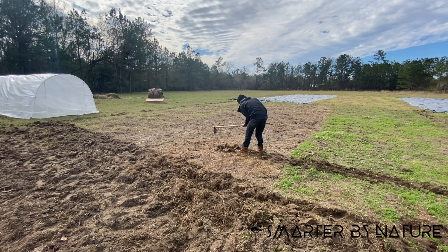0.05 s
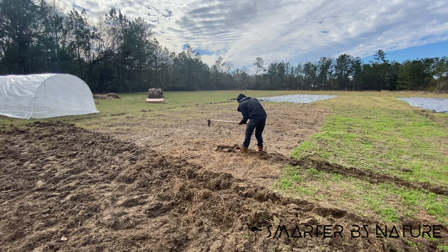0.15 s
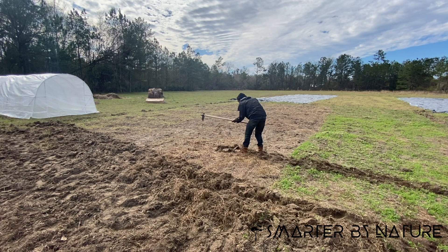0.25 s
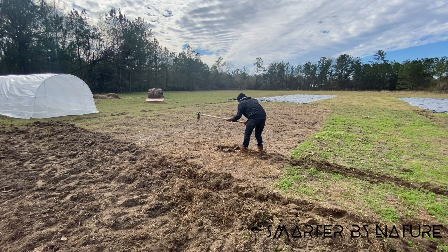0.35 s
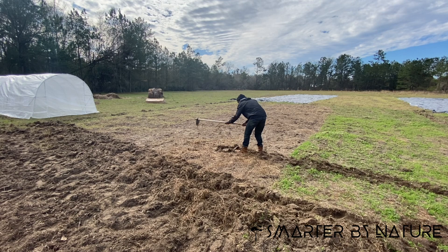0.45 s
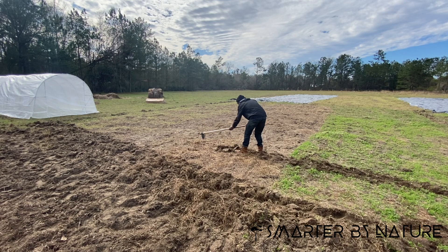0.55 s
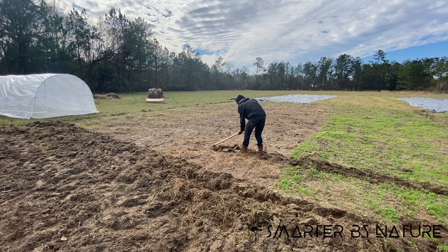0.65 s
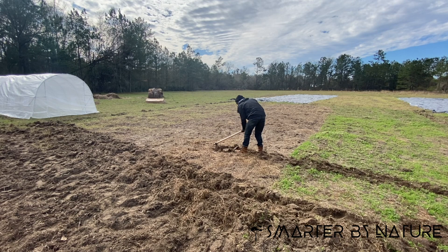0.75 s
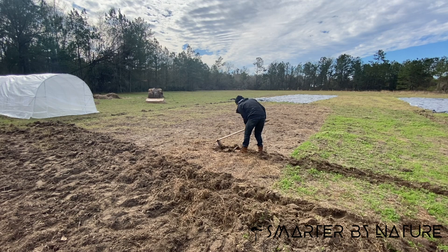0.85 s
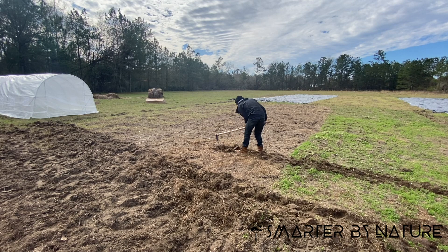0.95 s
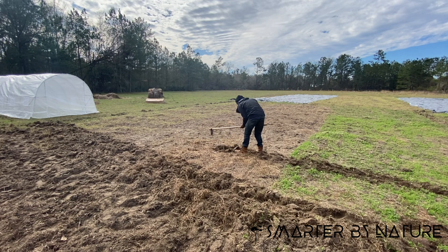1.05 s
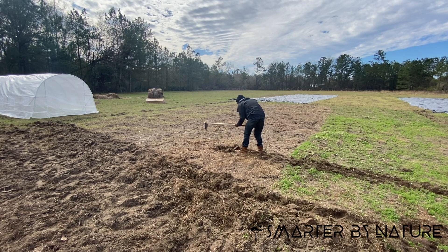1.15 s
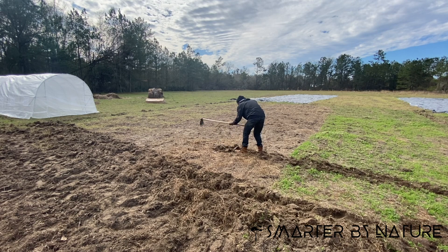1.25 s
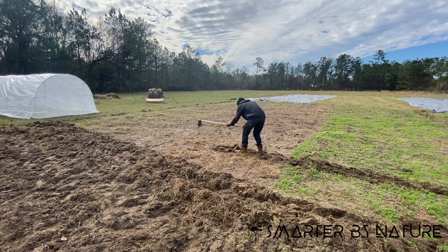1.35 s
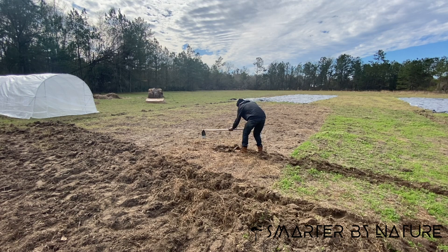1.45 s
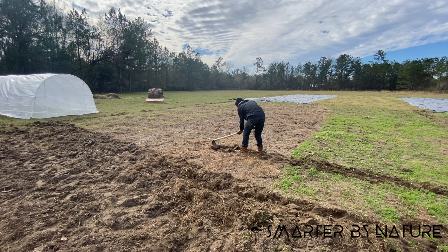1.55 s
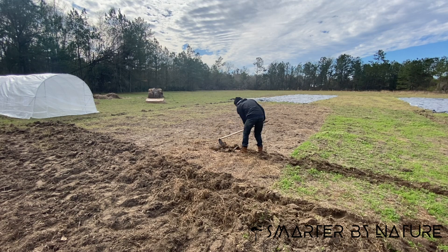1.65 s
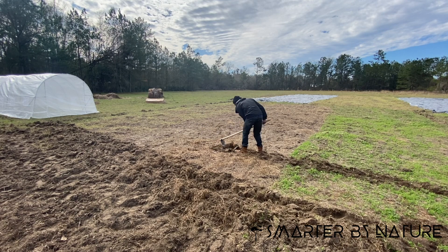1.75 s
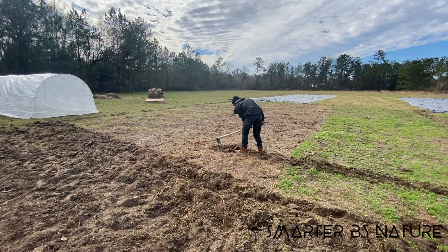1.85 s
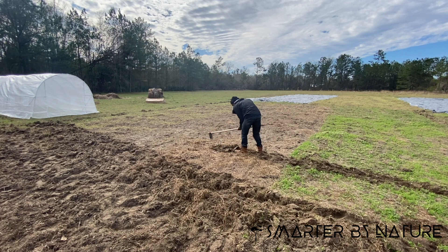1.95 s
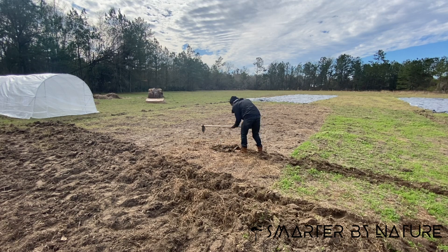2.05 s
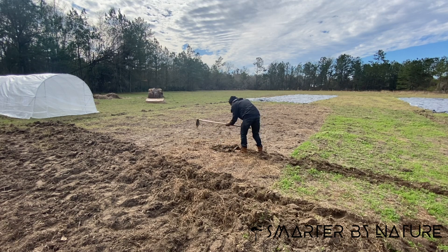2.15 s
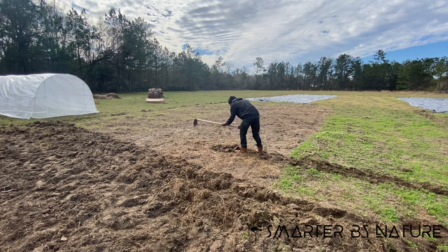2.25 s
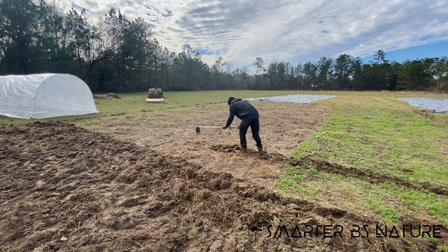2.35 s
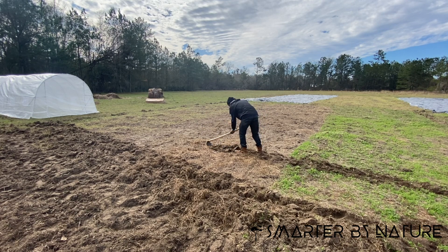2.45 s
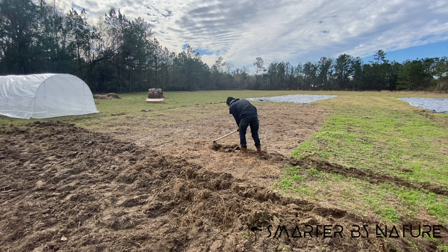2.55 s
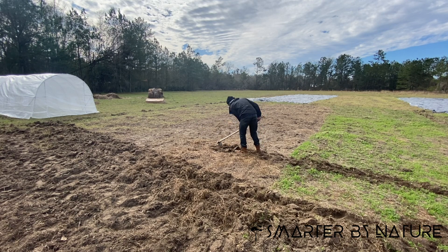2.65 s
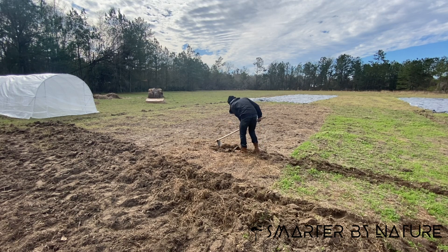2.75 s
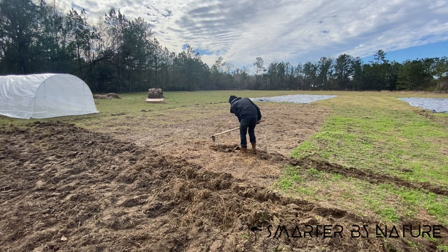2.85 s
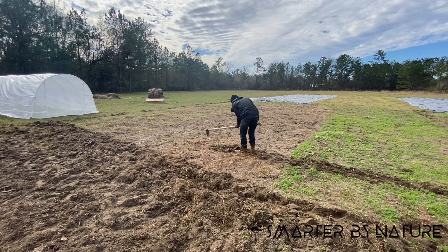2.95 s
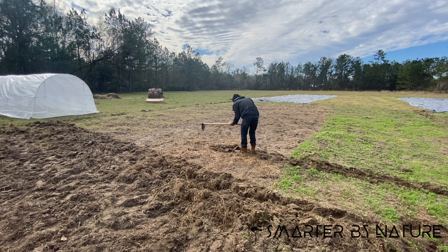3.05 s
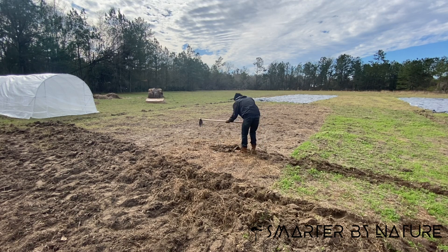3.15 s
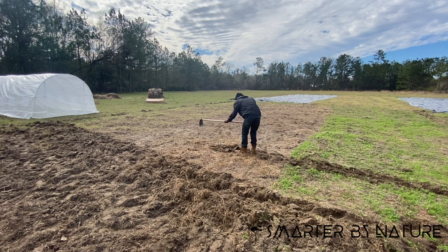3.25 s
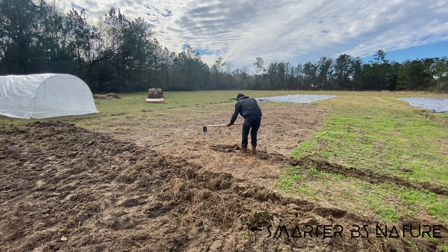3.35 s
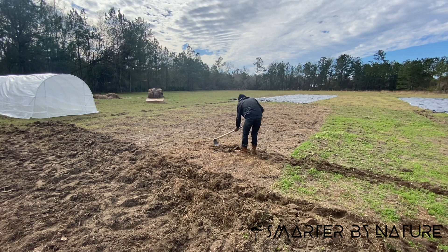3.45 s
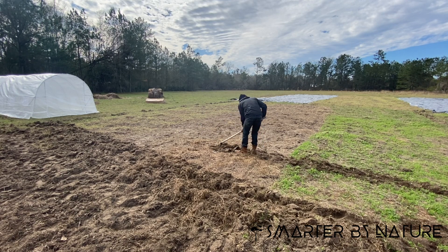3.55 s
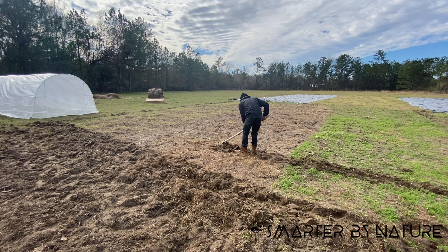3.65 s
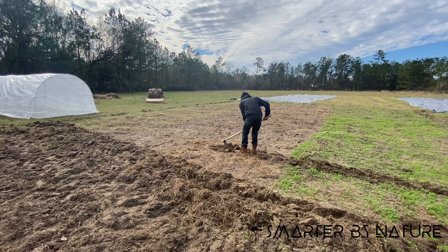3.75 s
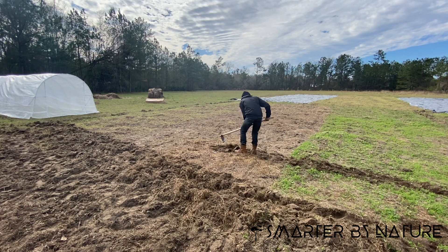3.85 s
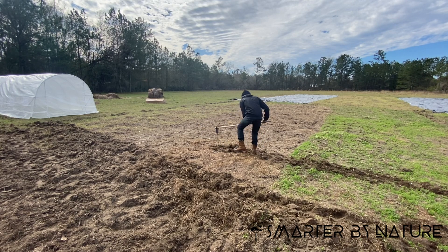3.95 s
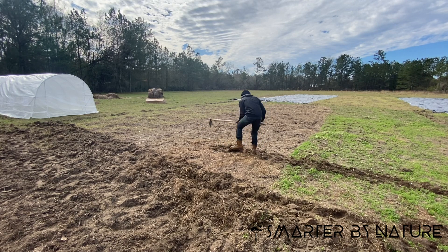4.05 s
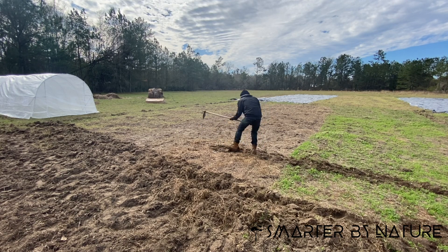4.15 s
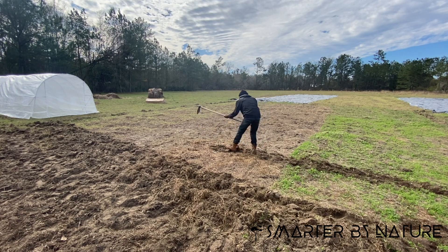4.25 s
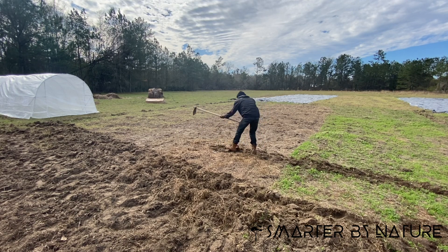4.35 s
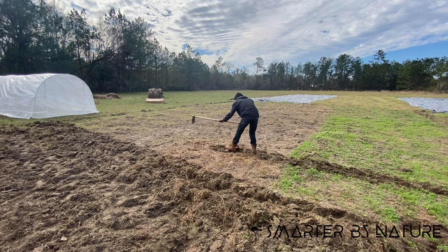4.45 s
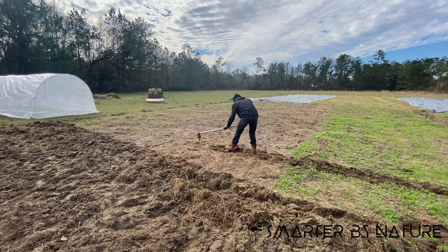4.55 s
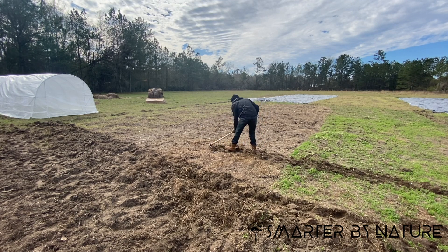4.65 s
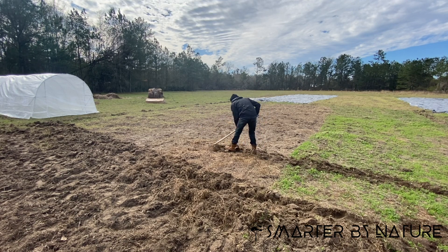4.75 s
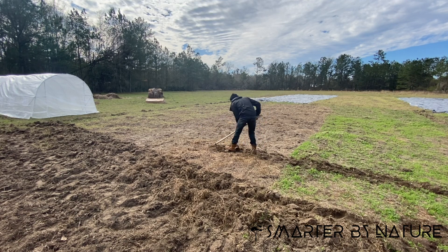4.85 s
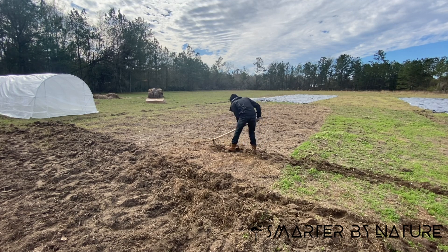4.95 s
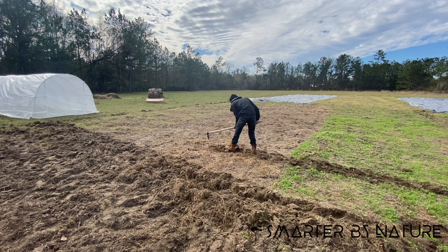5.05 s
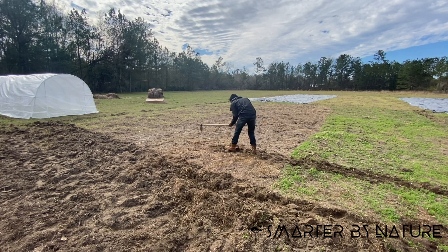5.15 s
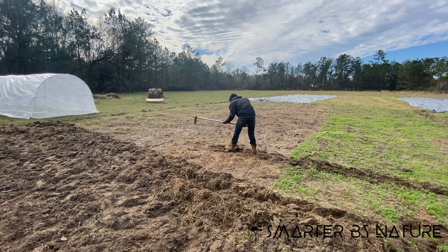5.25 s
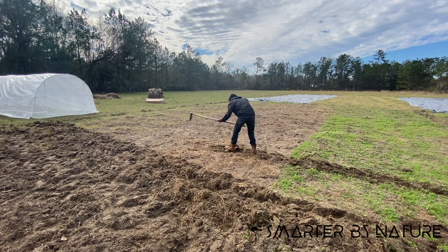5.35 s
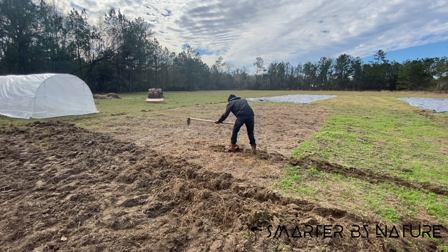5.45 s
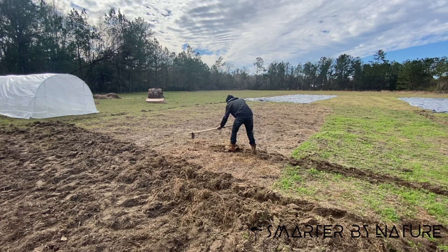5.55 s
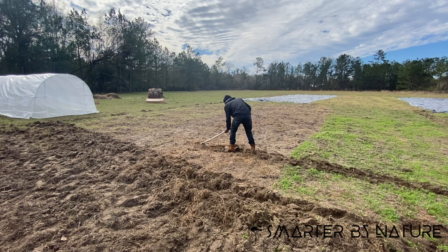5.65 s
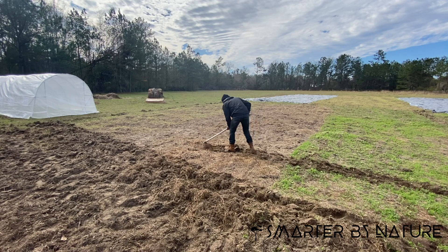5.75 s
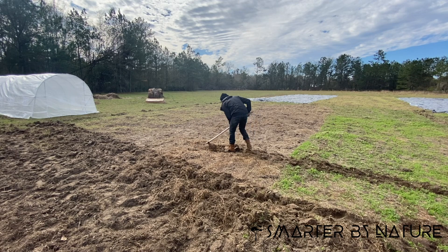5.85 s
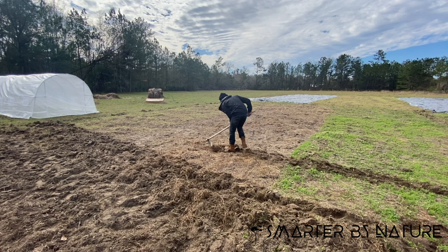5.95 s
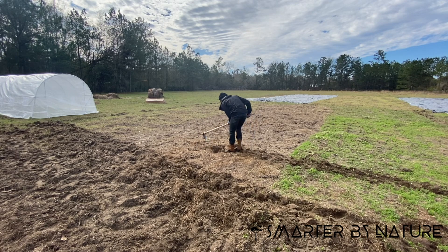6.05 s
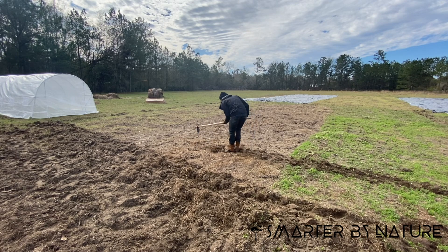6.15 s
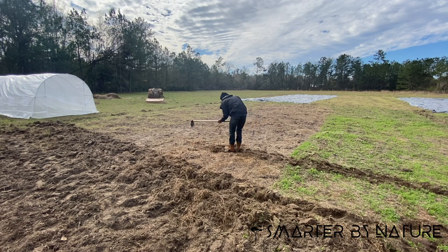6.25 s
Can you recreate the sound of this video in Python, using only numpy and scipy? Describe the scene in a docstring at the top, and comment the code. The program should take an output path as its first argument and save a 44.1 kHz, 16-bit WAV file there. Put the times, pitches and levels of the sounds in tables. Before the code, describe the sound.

In an open field, a hoe bites into grassy soil roughly once a second. Each chop is a crackling crunch with a brief damped metal ring, a dull thud and a fading treble hiss. Crumbs and grit tick between strokes and boots scuff. Sharp knocks, as if the microphone mount shifts, break in close by, the hardest after the third chop. Soft steady hiss, light gusts and low rumble lie behind.

```python
"""Hoeing grassy soil

A hoe chops into soil about once a second: bursts of tiny cracks, a short ring, a thud and a fading treble hiss.
Sharp knocks close by, as of a shifting microphone mount, are noise bursts through ringing filters; soft bumps
are low waves. Ticks, trickling crumbs and boot scuffs fall between. Shaped noise makes a steady background hiss,
a swelling rumble, light gusts, a faint hiss as of distant insects and a thin high trill; wavering sines make a
faint motor hum.
"""
import sys
import numpy as np
from scipy.fft import rfft, irfft, next_fast_len
from scipy.io import wavfile
from scipy.ndimage import uniform_filter1d

SR = 44100
rng = np.random.default_rng(int(sys.argv[2]) if len(sys.argv) > 2 else 0)


def put_to_file(sound):
    """Save the sound as 16-bit audio at rate SR, in the file named by the first command-line argument."""
    columns = np.atleast_2d(sound).T  # one column per channel
    safe = np.clip(columns, -1, 1)
    whole_steps = np.round(safe * 32767)
    wavfile.write(sys.argv[1], SR, whole_steps.astype(np.int16))


N = 277389
TIME = np.arange(N) / SR
SIZE = next_fast_len(N + 8192, True)
HZ = np.arange(SIZE // 2 + 1) * SR / SIZE

# Noise colours; only the shape counts, as power is evened out: (frequency [Hz], relative level [dB])
CRUNCH_COLOUR = [(90, -9.5), (450, 1.5), (900, 0), (1800, -6), (3500, -6.5), (4400, -2), (5100, -5.5),
                 (6200, -9.5), (7000, -5), (8000, -9.5), (9500, -19.5), (15500, -25)]
TAIL_COLOUR = [(300, -5), (700, -10), (1500, -6), (2700, -11.5), (4500, -17.5), (7200, -10.5),
               (9500, -19.5), (12000, -19.5), (15500, -34)]  # treble hiss that opens with each chop
SPRAY_COLOUR = [(3000, -26), (5500, -7.5), (8000, -2.5), (9500, -7.5), (11500, -6), (15500, -14)]  # tearing grass and trickling crumbs
BACKGROUND_COLOUR = [(60, -21), (150, -4.5), (280, -8.5), (500, -5), (900, 4), (1400, -6.5), (3100, -13),
                     (3800, -18.5), (5600, -17), (6800, -27), (8500, -29.5), (15000, -87)]
INSECT_COLOUR = [(2000, -2.5), (4800, -4), (7000, -9), (12000, -28.5)]
RUMBLE_COLOUR = [(20, -44.5), (36, -14), (48, 3.5), (80, 6.5), (160, -3), (240, -47)]
WIND_COLOUR = [(20, -51), (40, -1), (65, 2), (100, -2.5), (160, -8), (260, -30.5), (600, -56)]
RUB_COLOUR = [(120, -13), (400, -0.5), (1100, -7.5), (2700, -3.5), (7000, -7.5), (9500, -23), (15500, -16)]
SNAP_COLOUR = [(2000, -15.5), (4500, -2), (8000, -2.5), (11500, 14), (15500, -7)]
BOOT_COLOUR = [(150, -1), (700, 5.5), (1300, 0), (2300, -4.5), (4800, -9.5), (7000, -18), (15000, -32.5)]

# Ringing parts, again only relative: (frequency [Hz], width [Hz], relative level [dB])
BLADE_MODES = [(2190, 390, -2), (3090, 450, -0.5), (4320, 380, -10), (5940, 1100, 0.5), (6230, 500, 0),
               (7350, 660, -8)]  # steel blade, damped by the soil
MOUNT_MODES = [(988, 1800, -22), (1880, 410, -6.5), (2664, 440, -4), (3470, 370, 0.5), (4300, 290, -2),
               (6500, 1100, -11.5), (7770, 270, -4.5), (8320, 380, 2.5), (11030, 400, -8),
               (11750, 400, -11.5)]  # what rings in a knock
HOLLOW_MODES = [(910, 410, 1), (1600, 480, -2)]  # hollow ring of a knock

# Fixed phase offset, left port ahead of right: (frequency [Hz], phase [rad])
HOE_PHASE_LEAD = [(400, -.2), (1200, -4), (1800, -5.6), (2600, -6), (3400, -5.1), (5000, -5.1),
                  (6600, -6.5), (8200, -3.2), (10200, -6), (11700, -6.5)]
SHARED_PHASE_LEAD = [(0, 0), (400, -1.7), (3800, -9.4), (5400, -15.6), (6000, -15.4), (6700, -12.6),
                     (7600, -12.2), (8300, -9.7), (10300, -12.6), (12000, -14.7)]  # for the background, boots and knocks
# How alike the two ports are: (frequency [Hz], coherence [0 to 1])
HOE_ALIKE = [(200, 0.58), (2400, 0.78), (6000, 0.15), (11000, 0.38)]
BACKGROUND_ALIKE = [(900, 0.93), (2500, 0.54), (5600, 0.98), (7400, 0.69), (8500, 0.15)]
KNOCK_ALIKE = [(1000, 0.89)]
# How much stronger the left port is: (frequency [Hz], left minus right [dB])
HOE_LEFT_GAIN = [(300, -1), (2500, -3.5), (8000, -2.5), (10500, 0.5)]
BACKGROUND_LEFT_GAIN = [(7500, -0.53), (8500, -6)]
KNOCK_LEFT_GAIN = [(2500, -2), (6000, -3), (7700, -4), (8400, -7.5), (10300, -1)]
HOE = HOE_PHASE_LEAD, HOE_ALIKE, HOE_LEFT_GAIN
BACKGROUND = SHARED_PHASE_LEAD, BACKGROUND_ALIKE, BACKGROUND_LEFT_GAIN
CLOSE = SHARED_PHASE_LEAD, KNOCK_ALIKE, KNOCK_LEFT_GAIN

# Hoe strokes, the first already over at the start; the crunch level is before the soil and blade trims:
# (blade meets soil [s], crunch level [dB], sinking time [s], low blade ring level [dB],
#  tearing grass level [dB], treble hiss level [dB])
HOE_STROKES = [(-.09, -38, 0.012, -52, -50, -59), (0.668, -38.5, 0.026, -52, -53.5, -64.5),
               (1.578, -35, 0.022, -51, -50, -54.5), (2.5116, -35, 0.02, -41, -55, -59),
               (3.537, -37.5, 0.018, -40.5, -62, -66), (4.668, -36, 0.022, -49, -45.5, -59.5),
               (5.667, -38, 0.022, -42, -47.5, -61.5)]
# Stones nicked, roots snapping, clods landing, before the soil and blade trims:
# (time [s], level [dB], time to die by 60 dB [s])
STONE_HITS = [(0.6813, -31, 0.0024), (0.685, -33, 0.0045), (1.5886, -35, 0.023), (1.5993, -23, 0.0051),
              (1.6138, -38, 0.03), (2.5248, -29, .005), (2.54, -37.5, .006), (3.548, -41, 0.015),
              (3.5529, -22.5, 0.002), (3.5542, -35, 0.053), (4.6832, -34, 0.027), (4.7155, -45, .02),
              (5.6878, -33, 0.0035)]
# Loose crumbs trickling through grass: (thickest moment [s], half length [s], level [dB])
CRUMB_TRICKLES = [(0.085, 0.13, -69), (1.78, 0.19, -79), (2.88, 0.1, -72.5), (4.852, 0.082, -72),
                  (5.883, 0.16, -67)]
# Falling grit and dry stalk: (time [s], level [dB], pitch [Hz])
GRIT_TICKS = [(1.397, -47.5, 5300), (2.68, -55, 6500), (2.778, -63, 6900), (4.088, -63.5, 7800),
              (5.274, -62, 11900)]
# A boot shifting in the clods: (heaviest moment [s], half length [s], level [dB])
BOOT_STEPS = [(3.732, 0.029, -50), (3.813, 0.055, -48), (3.958, 0.096, -54.5), (5.428, 0.24, -59.5)]
# Background hiss before its overall lift: (time [s], level [dB])
HISS_LEVEL = [(0.0, -54.5), (3.9, -56), (4.5, -58.5), (5.47, -57), (6.28, -54.5)]
# Far motor hum and whine, relative to the hum level: (frequency [Hz], level [dB])
MOTOR_TONES = [(80.7, -20), (326, -17.5), (497, -20.5), (1920, -19.5)]
# Gusts: (strongest moment [s], half length [s], level [dB])
WIND_GUSTS = [(0.352, 0.5, -49), (1.396, 0.51, -51.5), (2.92, 0.2, -47.5), (3.72, 0.19, -50)]
# Soft bumps on the microphone: (start [s], level [dB], pitch [Hz], time to die by 60 dB [s])
SOFT_BUMPS = [(0.822, -44, 165, 0.042), (1.735, -39, 134.5, 0.06), (1.864, -36, 85.6, 0.11),
              (2.573, -31, 570, 0.043), (2.986, -44.5, 190.4, 0.11), (3.03, -37, 109.8, 0.059),
              (3.64, -39, 150.5, 0.1), (3.686, -34.5, 95.3, 0.055), (4.128, -47, 83, 0.14)]
# Sharp knocks; all levels but the thump are before shared trims:
# (time [s], crack level [dB], scuff level [dB], how early the scuff starts [s], bright snap level [dB],
#  thump level [dB], thump pitch [Hz], overtone pitch [Hz], clack level [dB], clack pitch [Hz],
#  hollow ring level [dB])
SHARP_KNOCKS = [(1.3309, -21.5, -33.5, 0.019, -55, -43.5, 195, 340, -29, 5270, -47),
                (2.5832, -9.5, -24, 0.0022, -52, -32, 170.6, 512, -15.5, 2650, -25.5),
                (3.8513, -34, -37, 0.013, -43, -34.5, 150.8, 360, -30.5, 4450, -34),
                (5.1269, -30, -37.5, 0.01, -41.5, -33, 236.6, 395.7, -31, 2950, -40)]

# The edge bites, presses harder while it sinks, then stops (STOP_S is a decay constant)
BITE_S, PRESS_DB, STOP_S = 0.0045, 3, 0.0036
CRUMBLE_DB, CRUMBLE_T60_S = -4.5, 0.16  # the cut soil goes on crumbling
# The treble hiss opens, is held until HOLD after the chop, then fades; a faint floor of it is always there
TAIL_RISE_S, TAIL_HOLD_S, TAIL_FADE_DB_PER_S, TAIL_FLOOR_DB = 0.031, 0.062, 52, -82
GROUND_HZ, GROUND_DB, GROUND_T60_S = 381.5, -22, 0.07  # level against the chop's crunch level
BLADE_HZ, BLADE_T60_S = 1290, 0.092
RUMBLE_DB, SWELL_DB, SWELL_AT_S, SWELL_HALF_S = -72.5, -49.5, 6.1, 0.72
BREEZE_DB = -55.5  # light air between gusts
ZING_HZ, ZING_WIDTH_HZ, ZING_DB = 8330, 320, 6.5  # added to twice a knock's crack level
THUMP_T60_S, OVERTONE_DB = 0.064, -8  # overtone level is against the thump
INSECTS_DB, INSECTS_AT_S, INSECTS_HALF_S = -60, 5.2, 1.65
TRILL_HZ, TRILL_WIDTH_HZ, TRILL_DB, TRILL_AT_S, TRILL_HALF_S = 7570, 200, -76.5, 5.5, 1.5
CUTOFF_HZ = 15900


def from_db(db):
    """Turn decibels into a plain gain."""
    return 10 ** (np.asarray(db) / 20)


def rms_one(x):
    """Scale to unit power."""
    return x / np.sqrt(np.mean(x ** 2) + 1e-20)


def over_hz(points):
    """Join a table's points with straight lines on a log-frequency axis."""
    hz, value = np.transpose(points)
    return np.interp(np.log(HZ + 1), np.log(hz + 1), value)


def drift(rate):
    """Wander between random values drawn rate times a second."""
    knots = rng.standard_normal(8192)
    return np.interp(TIME * rate, np.arange(len(knots)), knots)


def white():
    """Two unrelated streams of even noise."""
    return rng.standard_normal((2, N))


def colour(x, spectrum):
    """Give white sound a spectrum, keeping its power."""
    gain = rms_one(from_db(over_hz(spectrum)))
    return irfft(rfft(x, SIZE) * gain, SIZE)[..., :N]


def resonate(x, modes):
    """Pass white sound through ringing filters side by side, keeping its power."""
    body = 0
    for hz, width, db in modes:
        damping = 1j * HZ * width
        body = body + from_db(db) * np.square(damping / (hz ** 2 - HZ ** 2 + damping))
    return irfft(rfft(x, SIZE) * body / np.sqrt(np.mean(abs(body) ** 2)), SIZE)[..., :N]


def ports(pair, phase, likeness, balance):
    """Mix two unrelated signals into left and right with a set likeness, phase offset and balance."""
    mid, side = rfft(pair, SIZE)
    alike = np.clip(over_hz(likeness), 0, 1)
    sign = np.array([[1], [-1]])  # left, right
    both = np.sqrt((1 + alike) / 2) * mid + sign * np.sqrt((1 - alike) / 2) * side
    turn = np.exp(0.5j * sign * np.interp(HZ, *np.transpose(phase)))
    gain = from_db(sign * over_hz(balance) / 2)
    return irfft(both * turn * gain, SIZE)[:, :N]


def grains(per_s, spread_db):
    """Two streams of tiny clicks of very unequal size, scaled to unit power."""
    sizes = from_db(spread_db * np.minimum(rng.exponential(1, (2, N)), 4))
    sizes = sizes * rng.choice([-1, 1], (2, N))
    return rms_one(sizes * (rng.random((2, N)) < per_s / SR))


def bell(s, half):
    """A smooth rise and fall around the moment s."""
    return np.exp(-((TIME - s) / half) ** 2)


def swell(s, rise, t60):
    """Strength builds up to the moment s, then dies by 60 dB in t60 seconds."""
    building = np.clip(1 + (TIME - s) / rise, 0, 1)
    dying = np.exp(-np.log(1000) * np.clip((TIME - s) / t60, 0, 4))
    return np.sin(np.pi / 2 * building) * dying


def slip(envelope):
    """A burst of friction with its energy spread evenly over all pitches."""
    size = 8192
    start = np.argmax(envelope) - size // 8
    burst = rfft(rng.standard_normal((2, size)) * envelope[start:start + size])
    power = uniform_filter1d(abs(burst) ** 2, size=120) + 1e-18
    out = np.zeros((2, N))
    out[:, start:start + size] = irfft(burst * np.sqrt(power.mean() / power))
    return out


def thud(s, db, hz, t60, rise=0.0033, width=0.303, apart=0.61):
    """A few uneven cycles, a little out of step at the two ports (apart: radians each way)."""
    uneven_hz = hz * (1 + width / 2 * drift(hz))
    phase = 2 * np.pi * np.cumsum(uneven_hz) / SR - apart * np.array([[1], [-1]])
    return from_db(db) * swell(s + rise, rise, t60) * np.sin(phase)


def bite(s, length):
    """The edge bites, presses harder while it sinks, and stops; the cut soil crumbles on."""
    sunk = np.clip((TIME - s) / length, 0, 1)
    after = np.clip(TIME - s - length, 0, 1)
    stopping = np.exp(-np.minimum(after / STOP_S, 20))
    crumbling = from_db(CRUMBLE_DB) * np.exp(-np.log(1000) * after / CRUMBLE_T60_S)
    pressing = np.clip((TIME - s) / BITE_S, 0, 1) * from_db(PRESS_DB * (sunk - 1.5))
    return pressing * np.maximum(stopping, crumbling)


def cuts(per_s=5000, spread_db=3.0, rough_db=2.0, lump_rate=400, soil_db=-3.0, blade_db=-7, stone_rise=0.0004):
    """Roots and crumbs break in clumps under the blade; stones tick against it and the steel rings."""
    push = tear = stones = 0
    for s, db, length, _, tear_db, _ in HOE_STROKES:
        stroke = bite(s, length)
        push = push + from_db(db) * stroke
        tear = tear + from_db(tear_db) * stroke
    for s, db, t60 in STONE_HITS:
        stones = stones + from_db(db) * slip(swell(s, stone_rise, t60))
    clumps = from_db(rough_db * drift(lump_rate))
    soil = grains(per_s, spread_db) * push * clumps + stones
    steel = grains(per_s, spread_db) * push * clumps + stones
    grass = grains(per_s, spread_db) * tear * clumps
    crunch = from_db(soil_db) * colour(soil, CRUNCH_COLOUR)
    ring = from_db(blade_db) * resonate(steel, BLADE_MODES)
    return crunch + ring + colour(grass, SPRAY_COLOUR)


def treble_tail(per_s=2200, spread_db=1.0, rough_db=2.5):
    """A smooth treble hiss, made of dense clicks, opens with each chop and fades over about half a second."""
    level = from_db(TAIL_FLOOR_DB)
    for s, *_, db in HOE_STROKES:
        fading = np.maximum(TIME - s - TAIL_HOLD_S, 0)
        opening = np.clip((TIME - s) / TAIL_RISE_S, 0, 1)
        level = level + opening * from_db(db - TAIL_FADE_DB_PER_S * fading)
    return colour(grains(per_s, spread_db) * level * from_db(rough_db * drift(45)), TAIL_COLOUR)


def ground():
    """Soil and blade answer each chop with a dull thud and a short low ring."""
    out = 0
    for s, db, length, ring_db, *_ in HOE_STROKES:
        start = s + length / 2
        out = out + thud(start, db + GROUND_DB, GROUND_HZ, GROUND_T60_S, width=0.98)
        out = out + thud(start, ring_db, BLADE_HZ, BLADE_T60_S, width=0.1795)
    return out


def background_hiss(lift_db=6, waver_db=0.5):
    """Smooth noise whose level wavers slightly."""
    level_db = np.interp(TIME, *np.transpose(HISS_LEVEL)) + lift_db + waver_db * drift(6.73)
    return colour(white(), BACKGROUND_COLOUR) * from_db(level_db)


def motor_and_rumble(apart=0.21, hum_db=-50, tone_share=0.27, pitch_waver=0.00554, waver_db=3.0):
    """Motor sines waver together in pitch; low noise, with the lowest sine in it, swells unevenly once."""
    rumble = from_db(RUMBLE_DB)
    rumble = rumble + from_db(SWELL_DB) * bell(SWELL_AT_S, SWELL_HALF_S) * from_db(waver_db * drift(10))
    mid, side = colour(white(), RUMBLE_COLOUR) * rumble
    clock = np.cumsum(1 + pitch_waver * drift(7.2)) / SR  # time that runs a little unevenly
    hum = 0
    for hz, db in MOTOR_TONES:
        hum = hum + from_db(hum_db + db + waver_db * drift(3.3)) * np.sin(2 * np.pi * hz * clock)
    low_sine = np.sin(2 * np.pi * MOTOR_TONES[0][0] * clock)
    low_tone = tone_share * rumble * from_db(waver_db * drift(6.9)) * low_sine
    return hum, mid + low_tone + apart * side * [[1], [-1]]


def background():
    """Hiss, insects and hum share a fixed phase offset between the ports; the rumble is nearly alike at both."""
    hum, rumble = motor_and_rumble()
    steady = background_hiss() + insects()
    steady[0] += hum
    return ports(steady, *BACKGROUND) + rumble


def wind(lumpy_db=3.5, lump_rate=22):
    """Eddies buffet each port on its own, harder in the gusts."""
    power = from_db(BREEZE_DB) ** 2
    for s, half, db in WIND_GUSTS:
        power = power + (from_db(db) * bell(s, half)) ** 2
    lumps = from_db(lumpy_db * np.stack([drift(lump_rate), drift(lump_rate)]))
    return colour(rms_one(white() * lumps) * np.sqrt(power), WIND_COLOUR)


def trickles(per_s=450, spread_db=2.2, rough_db=2.5, clump_rate=60):
    """Single crumbs patter down through dry grass."""
    flow = sum(from_db(db) * bell(s, half) for s, half, db in CRUMB_TRICKLES)
    clumps = from_db(rough_db * drift(clump_rate))
    return colour(grains(per_s, spread_db) * flow * clumps, SPRAY_COLOUR)


def bumps():
    """Soft bumps shake the microphone without a crack."""
    return sum(thud(*bump) for bump in SOFT_BUMPS)


def knocks(rise=0.0011, crack_t60=0.0031, scuff_t60=0.071, snap_t60=0.052, scuff_delay=0.0014, rub_db=-1,
           level_db=-4):
    """A hard slip, bright snap and softer scuff set a stiff body ringing; a hard knock adds more zing."""
    crack = scuff = snap = zing = 0
    for s, db, scuff_db, early, snap_db, *_ in SHARP_KNOCKS:
        contact = slip(swell(s, rise, crack_t60))
        crack = crack + from_db(db) * contact
        zing = zing + from_db(2 * db + ZING_DB) * contact  # grows with the square of the strength
        scuff = scuff + from_db(scuff_db) * swell(s + scuff_delay, early + scuff_delay, scuff_t60)
        snap = snap + from_db(snap_db) * swell(s, rise, snap_t60)
    ringing = resonate(crack + white() * scuff / 2, MOUNT_MODES)
    ringing = ringing + resonate(zing, [(ZING_HZ, ZING_WIDTH_HZ, 0)])
    rubbing = colour(white() * scuff * from_db(rub_db), RUB_COLOUR)
    return from_db(level_db) * (ringing + rubbing + colour(white() * snap, SNAP_COLOUR))


def clacks(rise=0.0015, clack_t60=0.012, clack_width_hz=550, hollow_t60=0.083):
    """Each knock lands on a different spot, with a clack of its own pitch and a hollow ring."""
    clack = hollow = 0
    for s, *_, db, hz, hollow_db in SHARP_KNOCKS:
        contact = slip(swell(s, rise, clack_t60))
        clack = clack + from_db(db) * resonate(contact, [(hz, clack_width_hz, 0)])
        hollow = hollow + from_db(hollow_db) * slip(swell(s, rise, hollow_t60))
    return clack + resonate(hollow, HOLLOW_MODES)


def thumps(width=0.2, rise=0.0046):
    """Each knock shakes the mount at a low pitch and one overtone."""
    out = 0
    for s, *_, db, hz, overtone_hz, _, _, _ in SHARP_KNOCKS:
        start = s - rise / 2
        out = out + thud(start, db, hz, THUMP_T60_S, rise, width)
        out = out + thud(start, db + OVERTONE_DB, overtone_hz, THUMP_T60_S, rise, width)
    return out


def ticks(rise=0.0015, t60=0.071, width_hz=2600, dry_db=-5):
    """Each small fragment gives a dry, bright tick around a pitch of its own."""
    out = 0
    for s, db, hz in GRIT_TICKS:
        contact = from_db(db) * slip(swell(s, rise, t60))
        out = out + resonate(contact, [(hz, width_hz, 0)])
        out = out + from_db(dry_db) * colour(contact, SPRAY_COLOUR)
    return out


def insects():
    """A faint high hiss, as of distant insects, grows in the second half and eases again."""
    return colour(white(), INSECT_COLOUR) * from_db(INSECTS_DB) * bell(INSECTS_AT_S, INSECTS_HALF_S)


def boots(per_s=1800, spread_db=3.0, rough_db=2.0):
    """A boot grinds clods into small cracks, duller than those of the blade."""
    weight = sum(from_db(db) * bell(s, half) for s, half, db in BOOT_STEPS)
    return colour(grains(per_s, spread_db) * weight * from_db(rough_db * drift(60)), BOOT_COLOUR)


def trill(flutter_db=4, flutter_rate=40, pause_db=2.0, pause_rate=12):
    """A narrow high band of noise, as of an insect, flutters, comes and goes."""
    level_db = TRILL_DB + flutter_db * drift(flutter_rate) + pause_db * drift(pause_rate)
    band = resonate(white(), [(TRILL_HZ, TRILL_WIDTH_HZ, 0)])
    return band * from_db(level_db) * bell(TRILL_AT_S, TRILL_HALF_S)


def scene(clack_db=-4):
    """The hoe in the open air, with no walls to answer it."""
    digging = ports(cuts() + treble_tail() + trickles() + ticks(), *HOE) + ground()
    mount = ports(knocks() + from_db(clack_db) * clacks(), *CLOSE) + thumps() + bumps()
    return digging + ports(boots(), *BACKGROUND) + mount + background() + trill() + wind()


def record(dry):
    """The top of the spectrum is cut steeply."""
    gain = 1 / np.sqrt(1 + (HZ / CUTOFF_HZ) ** 200)
    return irfft(rfft(dry, SIZE) * gain, SIZE)[:, :N]


dry = scene()
out = record(dry)
put_to_file(out)
```